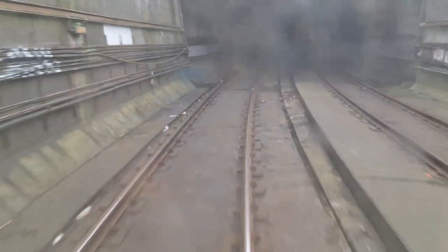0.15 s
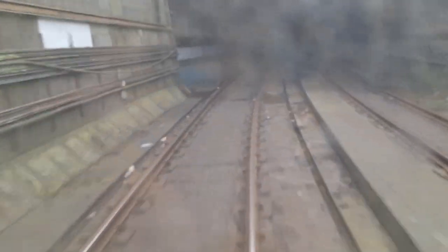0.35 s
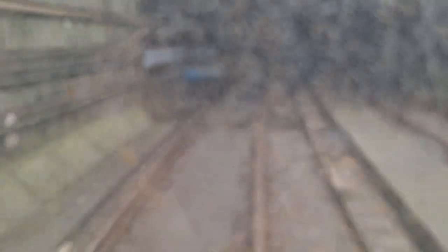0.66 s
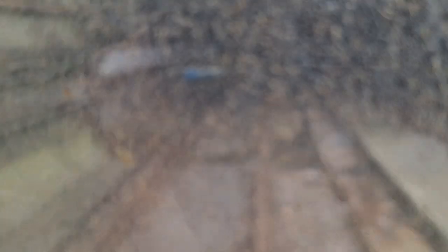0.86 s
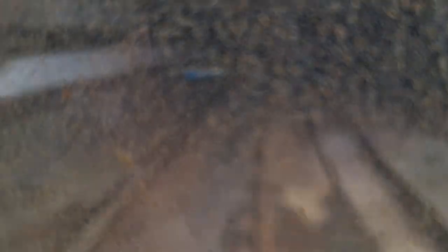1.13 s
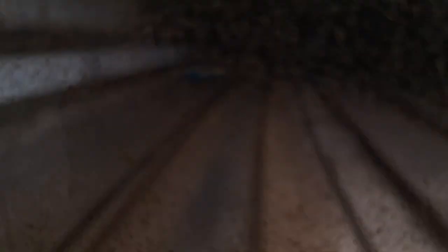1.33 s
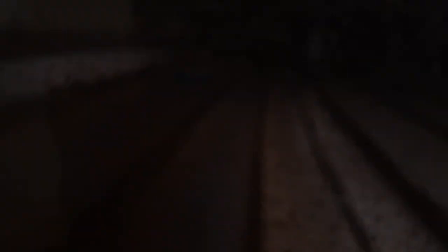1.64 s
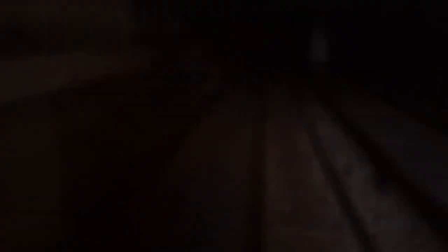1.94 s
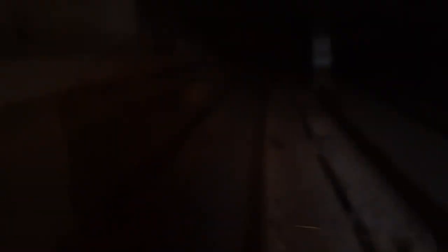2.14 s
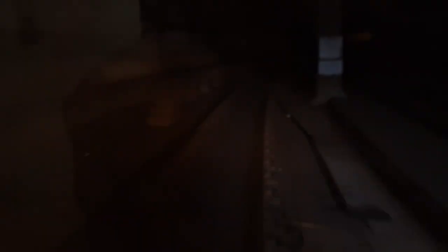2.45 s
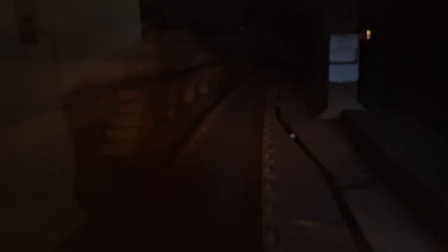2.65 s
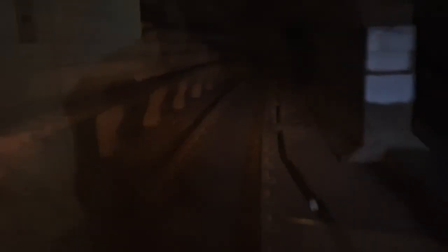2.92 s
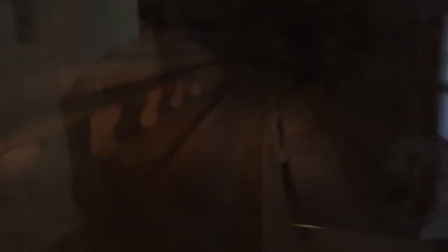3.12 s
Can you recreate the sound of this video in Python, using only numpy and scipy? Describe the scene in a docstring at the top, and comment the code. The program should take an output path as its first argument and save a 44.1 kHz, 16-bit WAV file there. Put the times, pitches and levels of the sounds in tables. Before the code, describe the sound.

Moving train interior with booming low rumble and swishing treble, growing fuller entering a tunnel

```python
"""Inside the front of a train that rolls from a walled cutting into a tunnel, heard in stereo.
Narrow bands of metal ring faintly and wheels squeal on a few ring modes, all from resonated noise.
The treble hiss swishes about once per wheel turn, with small ticks of decaying sines on the right.
Below it shaped noise makes the rolling roar, which thickens in the tunnel, and the lumpy boom of
the car body, which follows a drawn level curve."""
import sys
import numpy as np
from scipy import signal
from scipy.io import wavfile
from scipy.ndimage import uniform_filter1d

SR = 44100
rng = np.random.default_rng(int(sys.argv[2]) if len(sys.argv) > 2 else 0)


def output_pcm(signal):
    """Save a mono or channel-first signal as 16-bit PCM at the path in sys.argv[1].

    Samples are clipped to [-1, 1] before scaling.
    """
    pcm = np.clip(np.atleast_2d(signal).T, -1, 1) * 32767
    wavfile.write(sys.argv[1], SR, np.round(pcm).astype(np.int16))


N = 144648  # samples


def gain_of(db):
    """Amplitude factor of a level in dB."""
    return 10 ** (np.asarray(db) / 20)


def unit_rms(x):
    """Scales a signal to rms 1."""
    return x / np.sqrt(np.mean(x ** 2) + 1e-20)


def read(points, hz):
    """Reads a table over frequency, with straight lines on a logarithmic axis."""
    f, value = np.transpose(points)
    return np.interp(np.log(hz + 1), np.log(f + 1), value)


def along(rows, t, axis=1):
    """Reads one column of a table over time."""
    rows = np.array(rows)
    return np.interp(t, rows[:, 0], rows[:, axis])


def resonate(x, hz, width):
    """Shifts hz down to zero, smooths, and shifts back: a resonance of gain 1."""
    turn = np.exp(2j * np.pi * hz * np.arange(x.shape[-1]) / SR)
    r = np.exp(-np.pi * width / SR)
    smooth = signal.lfilter([1 - r], [1, -r], x / turn)
    return 2 * (turn * smooth).real


# Likeness of the two microphone channels. Each row: frequency in Hz, left-right correlation (-1 to 1).
STEREO_LIKENESS = [(60, 0.95), (92, 0.94), (140, 0.96), (210, 0.86), (330, 0.82), (500, 0.65), (770, 0.53),
                   (1170, -0.9), (1790, 0.23), (2740, -0.084), (4190, -0.0), (6410, -0.082), (9810, -0.047),
                   (15000, -0.11)]
# Lean of the noise to one side. Each row: frequency in Hz, left minus right in dB.
STEREO_LEAN = [(30, 3.5), (60, 2.3), (90, 2), (130, 1.5), (200, .8), (380, .5), (550, .8), (790, -.5),
               (1140, -1.5), (1650, -4), (2380, -1), (3440, -.5), (4970, -4), (7180, -3), (10400, -8),
               (15000, -3)]


def noise(spectrum, field_db, patchy_db, size):
    """Stereo random spectra; field_db(hz, t) shapes them; the middle of the pair has rms 1 at 0 dB."""
    hop, hz = size // 4, np.fft.rfftfreq(size, 1 / SR)
    frames = N // hop + 5
    a, b, c, d, patches = rng.standard_normal((frames, len(hz), 5)).T
    # patches of chance level, smoothed over frequency and then over time
    patches = uniform_filter1d(patches, size=size // 100, axis=0)
    patches = unit_rms(uniform_filter1d(patches, size=8, axis=1))
    same = np.clip(read(STEREO_LIKENESS, hz), -1, 1)[:, None]
    lean = gain_of(read(STEREO_LEAN, hz))[:, None]
    shared, other = a + 1j * b, c + 1j * d
    z = np.array([lean * shared, same * shared + np.sqrt(1 - same ** 2) * other])
    # the divisor keeps lean and likeness from changing the level of the middle
    z *= gain_of(read(spectrum, hz)[:, None] + patchy_db * patches) / np.sqrt(1 + lean ** 2 + 2 * same * lean)
    plain = signal.istft(z.mean(0), nperseg=size, noverlap=size - hop)[1]
    z *= gain_of(field_db(hz[:, None], np.arange(frames) * hop / SR))
    return signal.istft(z, nperseg=size, noverlap=size - hop)[1][:, :N] / np.std(plain)


# Faint ringing bands that last, each a middle frequency in Hz.
WHINE_BAND_HZ = [1552, 1815, 3130, 3574, 3795, 4375, 5100]
# The same bands in order. Each row: width in Hz, level in dB.
WHINE_BANDS = [(25, -62), (25, -63), (30, -68), (15, -70), (22, -63), (18, -66), (45, -69)]


def whine():
    """Narrow wavering bands of ringing metal: one noise through pairs of resonances."""
    rub = rng.standard_normal((2, N))
    out = np.zeros((2, N))
    for hz, (width, db) in zip(WHINE_BAND_HZ, WHINE_BANDS):
        band = resonate(resonate(rub, hz, width), hz, 3 * width)
        out += gain_of(db) * unit_rms(band)
    return out


# Wheel modes that squeal, each a frequency in Hz.
SQUEAL_MODE_HZ = [6520, 7806, 3908, 9085, 10900]
# Middle of the rough band around each mode, in Hz.
SQUEAL_SKIRT_HZ = [6540, 7700, 3908, 9085, 10900]
# The same modes. Each row: whistle width in Hz, skirt over whistle in dB, left minus right in dB.
SQUEAL_SHAPES = [(70, -3, -4), (35, 0, 1), (30, -14, 0), (50, -10, -4), (50, -10, -6)]
# A list for each mode. Each row: time in seconds, level of whistle and skirt together in dB.
SQUEAL_CURVES = [
    [(1.67, -68), (1.705, -57), (1.95, -53.5), (2.15, -47.5), (2.24, -49.5), (2.34, -53), (2.46, -56),
     (2.6, -78), (2.92, -66), (2.965, -52), (3.09, -51.5), (3.13, -59), (3.28, -59)],
    [(2.1, -70), (2.3, -61), (2.37, -54), (2.5, -55), (2.72, -50.5), (2.78, -53), (2.9, -59), (3.1, -76)],
    [(2.93, -66), (2.96, -54), (3.0, -51), (3.06, -54), (3.11, -63), (3.16, -75)],
    [(1.5, -76), (1.56, -63), (1.6, -64), (1.68, -68), (1.72, -76)],
    [(1.72, -76), (1.77, -66), (1.82, -69), (1.86, -77.5)],
]
SKIRT_WIDTH_HZ = 350  # of each of the two resonances in a row
SQUEAL_STEADY = .5  # share of the whistle's chance flutter that is evened out


def squeals():
    """Friction noise rings wheel modes: a fuzzy whistle in a rough skirt."""
    out, t = np.zeros((2, N)), np.arange(N) / SR
    modes = zip(SQUEAL_MODE_HZ, SQUEAL_SKIRT_HZ, SQUEAL_SHAPES, SQUEAL_CURVES)
    for hz, skirt_hz, (width, skirt_db, lean_db), level in modes:
        friction = rng.standard_normal((2, N))
        skirt = resonate(resonate(friction, skirt_hz, SKIRT_WIDTH_HZ), skirt_hz, SKIRT_WIDTH_HZ)
        whistle = unit_rms(resonate(skirt, hz, width))
        whistle = whistle / (abs(signal.hilbert(whistle)) + .3) ** SQUEAL_STEADY
        tone = unit_rms(whistle) + gain_of(skirt_db) * unit_rms(skirt)
        start, end = level[0][0], level[-1][0]
        fade = np.clip(np.minimum(t - start, end - t) / .03, 0, 1)  # 30 ms in and out
        side_db = lean_db / 2 * np.array([[1], [-1]])
        out += unit_rms(tone) * fade * gain_of(along(level, t) + side_db)
    return out


# Swishes, about one per wheel turn. Each row: peak in seconds, full lift in dB, fall time in seconds.
SWISH_TIMES = [(.07, 6.5, 0.085), (.24, 11.5, 0.086), (.42, 8.5, 0.086), (.575, 7, .045), (.71, 7, 0.1),
               (.89, 7, 0.051), (1.03, 6, 0.12), (1.21, 5.5, 0.088), (1.37, 8, 0.15), (1.55, 3.5, 0.072),
               (1.71, 5, 0.15), (1.9, 3.5, .05), (2.06, 1.5, 0.065), (2.21, 5, 0.028), (2.38, 1, .055),
               (2.53, 2.5, 0.069), (2.7, -2, 0.034), (2.86, 3.5, .06), (3.04, 2.5, 0.098),
               (3.22, 8.5, 0.083)]
# How much of the lift is heard. Each row: frequency in Hz, share of the lift.
SWISH_SHARES = [(500, 0), (1200, .25), (3000, .5), (6000, .6), (9000, 1), (15000, .95)]
SWISH_RISE_S = .022


def swish_db(hz, t):
    """Lift in dB: each swish swells quickly and mostly sinks more slowly, on bell-shaped curves."""
    lift = 0
    for peak, db, fall in SWISH_TIMES:
        lift = lift + db * np.exp(-((t - peak) / np.where(t < peak, SWISH_RISE_S, fall)) ** 2)
    return read(SWISH_SHARES, hz) * lift


# Single ticks. Each row: start in seconds, strike level in dB before the side gains.
TICK_STRIKES = [(.065, -40), (0.094, -38), (.18, -46), (.43, -42), (.708, -39), (.737, -42), (.895, -45),
                (.952, -43), (1.22, -45), (1.385, -45), (1.712, -45), (1.737, -42)]
# Ringing of one tick. Each row: frequency in Hz, level in dB, time to fall by 60 dB in seconds.
TICK_RINGING = [(5600, -8, .005), (9900, 0, .008), (11200, -3, .006)]
# weakest rattle before the side gains, mean rise above it (before its cap), and rate without a swish
RATTLE_DB, RATTLE_SPREAD_DB, RATTLES_PER_S = -68, 4.5, 60


def ticks():
    """Small loose parts, louder on the right: struck decaying sines, densest during swishes."""
    t = np.arange(N) / SR
    chance = RATTLES_PER_S / SR * gain_of(swish_db(10000, t))
    spread = np.minimum(rng.exponential(1, N), 3.5)
    hits = (rng.random(N) < chance) * gain_of(RATTLE_DB + RATTLE_SPREAD_DB * spread)
    hits *= rng.choice([-1., 1.], N)
    for start, db in TICK_STRIKES:
        hits[round(start * SR)] += gain_of(db)
    u = t[:600]
    ring = sum(gain_of(db - 60 * u / t60) * np.sin(2 * np.pi * hz * u) for hz, db, t60 in TICK_RINGING)
    return signal.oaconvolve(hits, ring)[:N] * gain_of([[-6], [3]])  # left, right


def rolling_field_db(levels, tilt_hz, hz, t):
    """Level over time, a tilt that fades in over the octave above tilt_hz, and the swishes."""
    tilt = along(levels, t, axis=2)
    upper = np.clip(np.log2(hz / tilt_hz + 1e-9), 0, 1)
    return along(levels, t) + upper * (tilt - tilt.mean()) + swish_db(hz, t)


# Colour of the hiss. Each row: frequency in Hz, relative level in dB per Hz.
HISS_SPECTRUM = [(680, -8), (1150, 3), (1260, -9), (1450, 3.5), (1760, 2), (1940, 0), (2120, 1),
                 (2310, -1.5), (2610, -1.5), (3280, -5.5), (3820, -4), (4130, -4.5), (4760, -5.5),
                 (5190, -4), (5920, -7.5), (6460, -7), (7130, -9), (7860, -12.5), (8580, -18),
                 (10900, -11.5), (13100, -18.5), (15100, -18), (15600, -24)]
# Hiss over time. Each row: time in seconds, level in dB, top treble tilt in dB before its mean is removed.
HISS_CURVE = [(0, -48, 10), (.6, -49, 7.5), (1.2, -49, 8.5), (1.65, -50, 7.5), (2.0, -49, 9.5),
              (2.3, -46, 13.5), (2.65, -45, 10), (2.95, -46, 13.5), (3.28, -48, 7.5)]


def hiss():
    """Treble of rolling and air: shaped noise that swishes."""
    return noise(HISS_SPECTRUM, lambda hz, t: rolling_field_db(HISS_CURVE, 6000, hz, t),
                 patchy_db=1.25, size=512)


# Wheels on rails, through the floor. Each row: frequency in Hz, relative level in dB per Hz.
ROAR_SPECTRUM = [(65, -84), (110, -2.5), (200, -6), (258, -14.5), (296, -8.5), (344, -14.5), (399, -15.5),
                 (468, -13), (531, -18), (788, -19), (915, -24), (1220, -43), (1400, -44.5), (1820, -62),
                 (3080, -120)]
# Roar over time. Each row: time in seconds, level in dB, upper roar tilt in dB before its mean is removed.
ROAR_CURVE = [(0.02, -28, -5.5), (0.34, -31, -2), (1.2, -26, -8), (1.25, -31, 0.5), (1.3, -26, -8),
              (1.36, -34.5, 1.5), (1.64, -25.5, -9.5), (1.68, -34, -0.5), (1.78, -22.5, -8),
              (2.47, -23, -7), (2.48, -26, -4.5), (2.54, -17.5, -9), (2.61, -22.5, -5), (3.27, -20.5, -8.5)]


def roar():
    """Rolling noise through the floor, fuller in the tunnel."""
    return noise(ROAR_SPECTRUM, lambda hz, t: rolling_field_db(ROAR_CURVE, 180, hz, t),
                 patchy_db=0.43, size=2048)


# Resonance of the car body. Each row: frequency in Hz, relative level in dB per Hz.
BOOM_SPECTRUM = [(12, -45), (22, -26), (33, -7), (43, -10), (54, -4), (62, -3), (70, -5), (79, 2), (85, -3),
                 (91, -17), (102, -15), (112, -22), (135, -30), (190, -60), (300, -140)]
# Lumps of the boom. Each row: time in seconds, level in dB.
BOOM_CURVE = [(0.02, -14.5), (0.04, -8.5), (0.15, -21), (0.21, -10), (0.25, -16.5), (0.28, -20),
              (0.33, -21.5), (0.45, -12.5), (0.48, -29), (0.52, -12.5), (0.78, -15.5), (0.81, -21),
              (0.85, -11), (0.88, -25), (1.0, -10), (1.06, -10.5), (1.09, -21.5), (1.19, -7.5),
              (1.24, -24.5), (1.29, -9), (1.37, -11.5), (1.41, -16), (1.53, -14), (1.6, -18.5), (1.76, -14),
              (1.78, -25), (1.84, -10.5), (1.95, -22.5), (1.97, -15), (2.16, -10.5), (2.24, -18.5),
              (2.32, -6.5), (2.39, -19), (2.5, -9), (2.56, -16.5), (2.65, -9.5), (2.73, -20.5), (2.75, -8),
              (2.81, -21), (2.85, -6), (2.9, -28), (2.93, -13.5), (3.01, -14), (3.07, -18), (3.18, -11),
              (3.27, -18.5)]
BOOM_STEADY = .8  # share of the chance swell that is evened out


def boom():
    """Low body resonance whose lumps follow the level curve more than chance."""
    x = noise(BOOM_SPECTRUM, lambda hz, t: 0 * hz * t, patchy_db=0, size=8192)
    swell = np.sqrt(uniform_filter1d(x.mean(0) ** 2, size=1800) + 0.036)  # over 41 ms
    x = x / swell ** BOOM_STEADY
    return x / np.std(x.mean(0)) * gain_of(along(BOOM_CURVE, np.arange(N) / SR))


def scene():
    """All layers together, from the faint ringing to the boom."""
    return whine() + squeals() + ticks() + hiss() + roar() + boom()


def band_limit(x):
    """A steep low-pass at the top of the band."""
    return signal.sosfilt(signal.butter(12, 16310, fs=SR, output="sos"), x)


LOW_CUT_HZ, CEILING = 29, .9  # the ceiling is an amplitude, full scale being 1


def record(dry):
    """The microphones lose the deepest bass; the loudest booms are softly clipped."""
    low_cut = signal.butter(3, LOW_CUT_HZ, "high", fs=SR, output="sos")
    thin = signal.sosfilt(low_cut, dry)
    held = thin / (1 + abs(thin / CEILING) ** 6) ** (1 / 6)
    return band_limit(held)


dry = scene()
out = record(dry)
output_pcm(out)
```